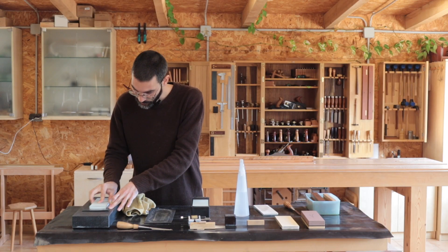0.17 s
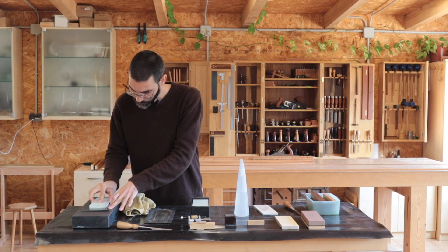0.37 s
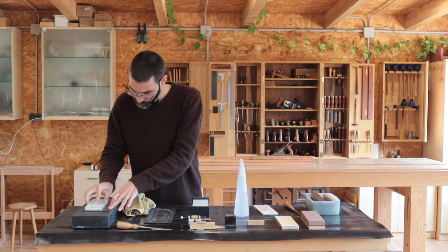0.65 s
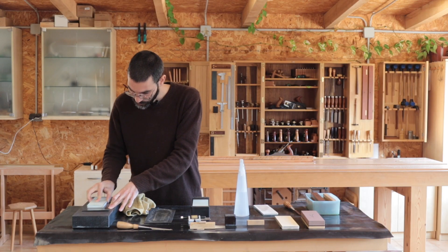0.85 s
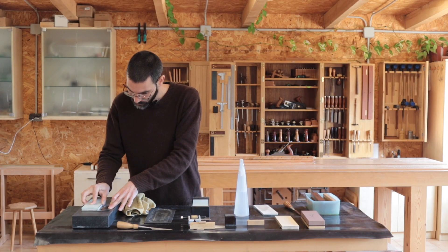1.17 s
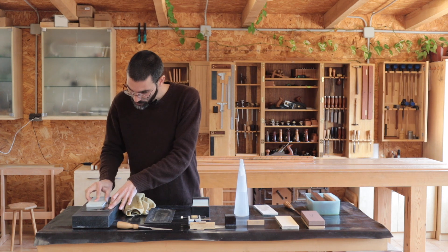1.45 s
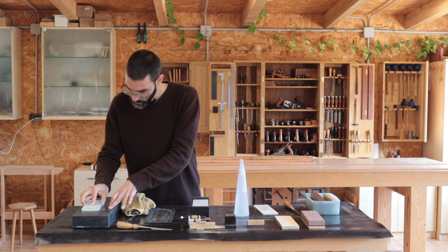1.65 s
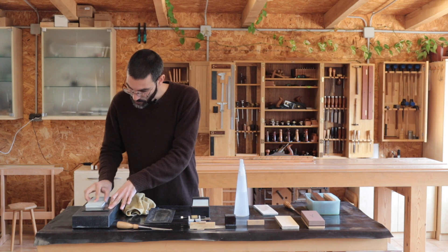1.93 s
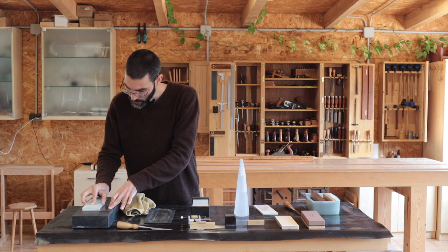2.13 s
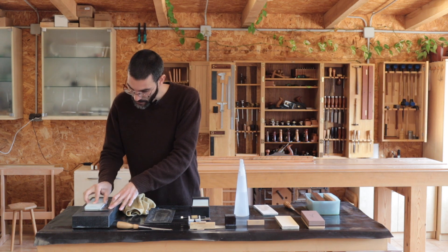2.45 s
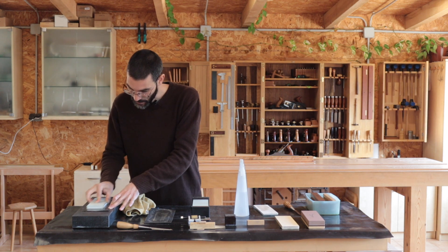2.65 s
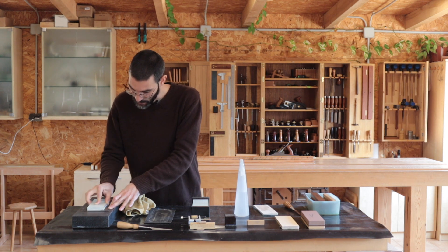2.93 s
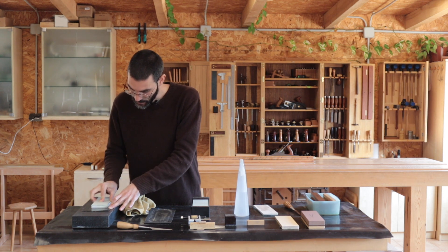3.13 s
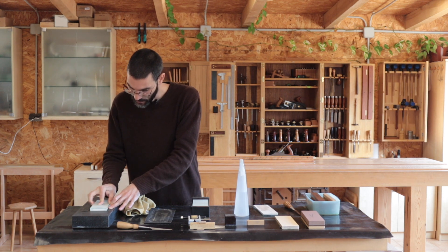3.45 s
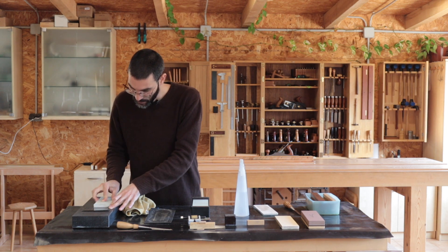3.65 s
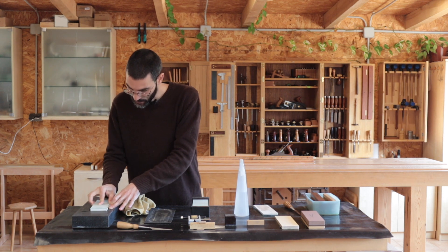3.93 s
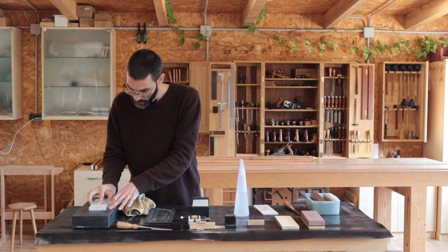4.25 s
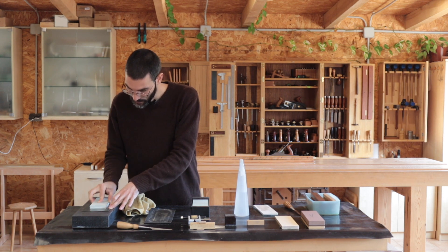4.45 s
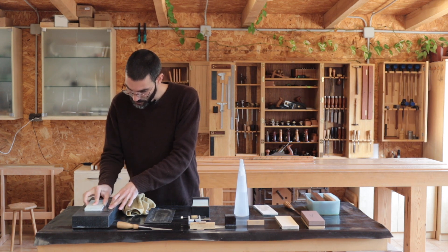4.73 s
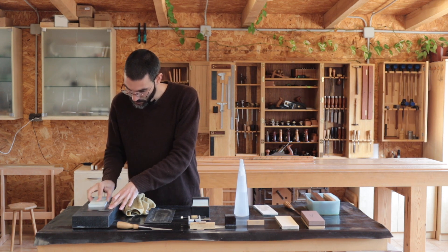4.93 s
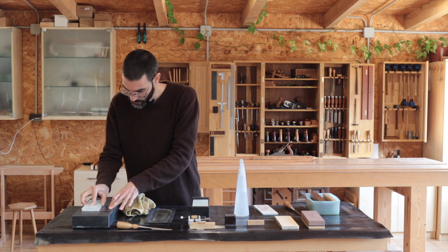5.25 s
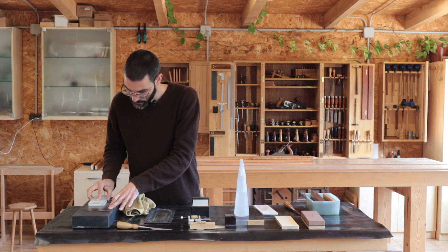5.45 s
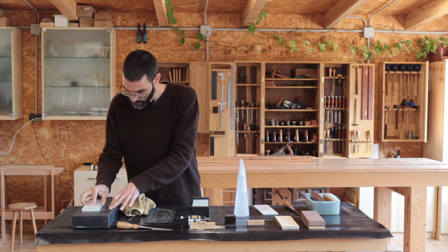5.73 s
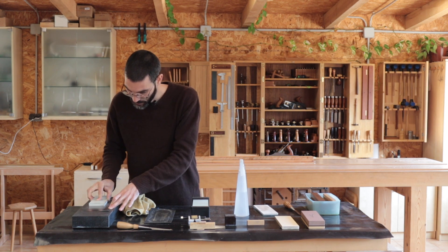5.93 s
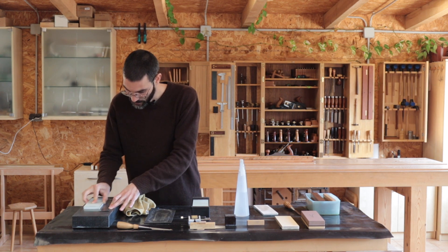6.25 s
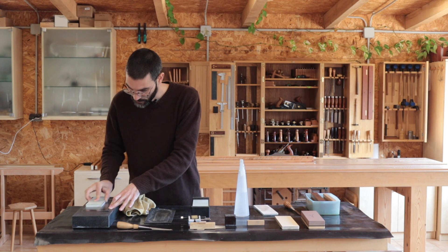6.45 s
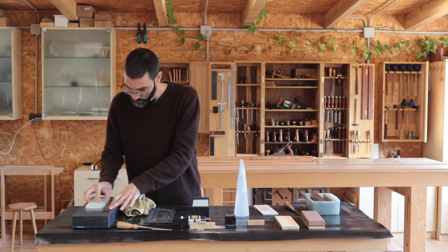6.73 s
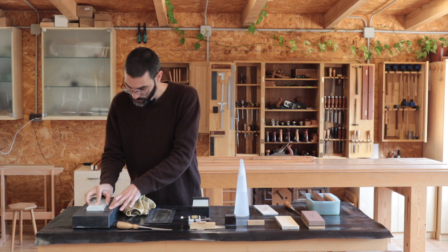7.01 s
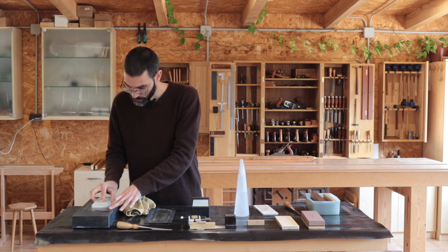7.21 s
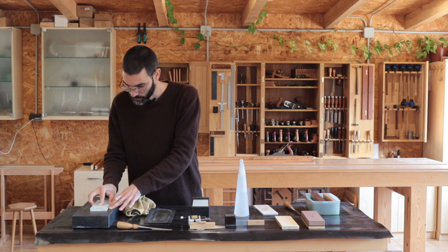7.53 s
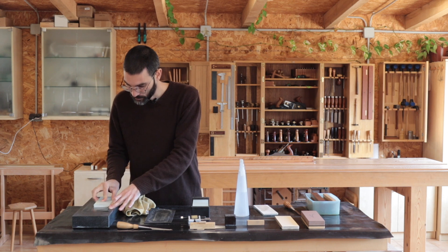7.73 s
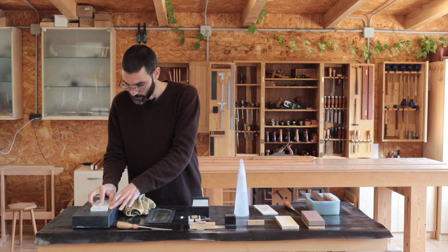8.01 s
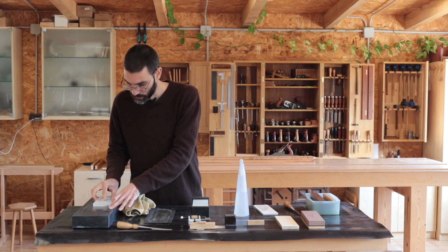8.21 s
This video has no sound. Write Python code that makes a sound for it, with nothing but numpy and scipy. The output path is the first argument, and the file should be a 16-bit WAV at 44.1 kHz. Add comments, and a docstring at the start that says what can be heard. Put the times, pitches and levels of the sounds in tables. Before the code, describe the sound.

Close to the microphone in a small wooden workshop, a sharpening stone rasps to and fro on wet sandpaper in a quick, regular rhythm. The water hisses under it and gives short, high squeals near the start, around a cluster of knocks on the workbench. After that the strokes run on steadily, the bench rumbling and thumping softly at each turn, with a faint hum behind.

```python
"""A small wooden workshop, one microphone close to the bench. A ceramic sharpening stone is scrubbed to
and fro on wet sandpaper stuck to a slab. Grit rasps under the stone and rings the slab; the water film
hisses in a moving band and, on some early strokes, pinches and squeals. The bench rumbles, thumps
softly at each turn and takes the odd knock. A faint hum lies under it all."""
import sys
import numpy as np
from scipy import signal
from scipy.io import wavfile
from scipy.ndimage import uniform_filter1d

SR = 44100
rng = np.random.default_rng(int(sys.argv[2]) if len(sys.argv) > 2 else 0)


def master_out(mix):
    """Clip the mix to full scale and print it as 16-bit PCM to the path in sys.argv[1]."""
    frames = np.transpose(np.atleast_2d(mix))
    ceiling = np.clip(frames, -1, 1)
    pcm = np.round(ceiling * 32767).astype(np.int16)
    wavfile.write(sys.argv[1], SR, pcm)


N = 369147

# spectrum of the bench's rumble: (frequency [Hz], level [dB])
RUMBLE_SPECTRUM = [(30, -3), (60, -18.5), (110, -6), (190, -1.5), (260, -1.5), (340, -2), (440, 3.5),
                   (800, 1), (1200, -7.5), (2000, -15.5)]
# the rumble over time: (time [s], base level [dB], extra bass under 350 Hz [dB])
RUMBLE_LEVELS = [(0.0, -35, -5), (0.3, -43.5, -3), (0.9, -47.5, -1.5), (1.8, -45, -2), (2.1, -46, -1.5),
                 (3.05, -47, 0.5), (3.6, -42.5, -0.5), (4.2, -44, -2), (4.8, -46.5, 1), (6.4, -44.5, 0),
                 (7.1, -44.5, 2), (8.37, -48, 1.5)]
# push and pull in turn: (start [s], stop [s], rasp level [dB], treble tilt [dB], slab ring level [dB],
# hiss pitch [Hz], hiss level [dB], hiss growth over the stroke [dB])
STROKES = [ (0.016, 0.197, -15.5, 0.5, -21.5, 4330, -39, -3), (0.237, 0.434, -16.5, 1, -22, 7150, -26, 5),
           (0.468, 0.647, -15, -2, -20.5, 7450, -28, -3), (0.689, 0.89, -17.5, 0.5, -22, 6940, -27, -6),
           (0.919, 1.104, -16.5, -2, -25.5, 4540, -23.5, -6), (1.139, 1.334, -17, 0, -22.5, 4140, -25, 12),
           (1.371, 1.55, -15.5, -9.5, -28, 3700, -22.5, 7),
           (1.586, 1.788, -18, -0.5, -23.5, 4800, -20.5, -5),
           (1.813, 2.015, -18.5, -1.5, -25, 4400, -26, -3), (2.041, 2.246, -17, 1, -23, 6730, -24, 2),
           (2.286, 2.473, -16, -0.5, -24, 4820, -29, 10), (2.509, 2.712, -16.5, 2, -23.5, 7170, -25.5, 7),
           (2.746, 2.933, -17, 1.5, -22.5, 7250, -31, -20), (2.965, 3.164, -17.5, 5, -23, 8860, -28, 3),
           (3.196, 3.377, -16, 0.5, -22, 4100, -36, 3), (3.414, 3.61, -16, -1, -23, 7750, -27, 3),
           (3.65, 3.826, -17.5, 1.5, -21, 2190, -27.5, 10), (3.869, 4.055, -17, 2, -22.5, 2180, -28, -9),
           (4.092, 4.274, -15.5, -1.5, -22.5, 8150, -30, -1), (4.313, 4.492, -15.5, 0, -23.5, 7900, -27, 4),
           (4.532, 4.72, -16.5, 0.5, -23.5, 2400, -29, 6), (4.754, 4.943, -16, 0.5, -24, 8960, -26, 0),
           (4.976, 5.169, -16, 0, -22.5, 4460, -41, -2), (5.201, 5.39, -15.5, -0.5, -26, 7330, -25, 7),
           (5.431, 5.624, -16.5, 2.5, -23, 6800, -38, -1), (5.653, 5.864, -17, 1, -26, 5880, -23.5, 8),
           (5.896, 6.096, -17.5, 1, -22.5, 8130, -29, -9), (6.126, 6.314, -16.5, 1, -26, 4700, -24, 12),
           (6.351, 6.551, -18, 1.5, -21, 2620, -32.5, 20), (6.589, 6.787, -17.5, 1, -22.5, 7700, -32, 8),
           (6.824, 7.004, -17, 1.5, -23.5, 2600, -30, 13), (7.04, 7.233, -16.5, -1, -24.5, 8230, -23.5, 3),
           (7.268, 7.443, -17, -1.5, -24.5, 2310, -31.5, 12), (7.479, 7.668, -17, -1, -23.5, 2300, -30, 4),
           (7.711, 7.904, -19.5, -1, -25, 2220, -26.5, -1), (7.947, 8.14, -18.5, -2, -25, 2290, -27, 3),
           (8.184, 8.39, -17.5, -4.5, -24.5, 2350, -32.5, 5), ]
# spectrum of the rasp: (frequency [Hz], level [dB])
RASP_SPECTRUM = [(700, -16), (1100, -7.5), (2000, -1.5), (2800, -2), (3500, -3), (4200, -1.5), (5000, -2),
                 (6000, -4.5), (8000, -2.5), (10200, -7)]
# what the rasp gains: (frequency [Hz], near to far end [dB], rest to full speed [dB], start to stop [dB])
RASP_SHIFTS = [(1100, -3.5, -9.5, -5), (1900, -1.5, -2, -1), (2600, 7, -4.5, -3.5), (4000, 1.5, 0, -1.5),
               (6000, 1.5, 1, 0.5), (7700, -2.5, 3, -3)]
# modes of the slab: (frequency [Hz], width [Hz], level [dB])
SLAB_MODES = [(1110, 203, -6), (1250, 49.6, 9), (1323.6, 50.3, 9), (1484, 130, 0), (1728, 84, 6.5),
              (1900, 140, -13)]
# the stone's path favours the modes near this pitch: (time [s], pitch [Hz])
FAVOURED_PITCH = [(0, 1370), (0.6, 1410), (1.3, 1580), (2.6, 1534), (3.7, 1510), (4.3, 1460), (5.3, 1650),
                  (6.6, 1680), (7.3, 1550), (8.37, 1480)]
# the slab's ring at the far end against the near end: (time [s], gain [dB])
RING_FAR_GAIN = [(0, 4.5), (2.5, -3), (4.5, -2.5), (8.37, -9.5)]
# modes of the bench: (frequency [Hz], level [dB], t60 [s])
BENCH_MODES = [(230, -2.5, 0.023), (520, 9.5, 0.013), (734, 1, 0.03)]
# blows on the bench: (time [s], peak [dB], dullness [dB/octave])
KNOCKS = [(.486, -27, -11), (.93, -32, -13), (1.472, -35, 3), (1.598, -14.5, -2), (1.751, -35, 8),
          (1.797, -30, 8), (1.811, -19, 4), (1.853, -18.5, 1.5), (2.052, -29, 0), (3.561, -29, -1),
          (3.82, -41, 7), (4.278, -36, -4), (7.21, -34, 4), (7.239, -41, 14), (7.91, -41, 9)]
# the film pinches: (start [s], stop [s], level [dB], growth [dB], pitch at start [Hz],
# a quarter in [Hz], at stop [Hz])
SQUEALS = [(0.938, 1.064, -20.5, -1, 4700, 4500, 5050), (1.17, 1.34, -27.5, -4, 4070, 4150, 2600),
           (1.381, 1.546, -23.5, -16, 4450, 3440, 4100), (1.637, 1.753, -29, 3, 4100, 4200, 3700),
           (1.83, 2.016, -19.5, -2, 4420, 4150, 4300), (2.325, 2.473, -23, -3, 4600, 4800, 4500)]
# decay of the wooden room: (frequency [Hz], t60 [s])
ROOM_DECAY = [(200, 0.94), (1500, 1), (5000, 0.7), (10000, 0.35)]


def gain_of(db):
    """Decibels to a factor."""
    return 10 ** (np.asarray(db) / 20)


def unit_rms(x):
    """Scales to rms 1."""
    return x / np.sqrt(np.mean(x ** 2) + 1e-20)


def at_hz(points, hz):
    """Reads a table on a log-frequency axis."""
    f, value = np.transpose(points)
    return np.interp(np.log(hz + 1), np.log(f + 1), value)


def add(mix, start_s, sound):
    """Mixes a sound in at a time."""
    part = mix[round(start_s * SR):][:len(sound)]
    part += sound[:len(part)]


def resonate(x, hz, widths_hz):
    """Resonances in series, one per width: each shifts hz down to zero, smooths, and shifts back."""
    carrier = np.exp(2j * np.pi * np.cumsum(hz * np.ones(len(x))) / SR)
    for width in widths_hz:
        pole = np.exp(-np.pi * width / SR)
        x = 2 * (carrier * signal.lfilter([1 - pole], [1, -pole], x / carrier)).real
    return x


def grit(per_s, spread_db):
    """Grains catching and letting go: dense clicks of random sign, a few of them large."""
    size = gain_of(spread_db * np.minimum(rng.exponential(1, N), 5)) * rng.choice([-1., 1.], N)
    return unit_rms(size * (rng.random(N) < per_s / SR))


def coloured(x, colour_db, patchy_db, frame):
    """Shapes short-time spectra by colour_db(hz, t) and by drifting random patches."""
    framing = dict(fs=SR, nperseg=frame, noverlap=frame * 3 // 4)
    hz, t, spectra = signal.stft(x, **framing)
    patches = uniform_filter1d(rng.standard_normal(spectra.shape[::-1]).T, size=5, axis=0)
    patches = unit_rms(uniform_filter1d(patches, size=20, axis=1))
    spectra = spectra * gain_of(colour_db(hz[:, None], t) + patchy_db * patches)
    return unit_rms(signal.istft(spectra, **framing)[1][:N])


def sliding(lead_s, rise_s, fall_s, lag_s):
    """1 while the stone slides, 0 where it rests at the turn."""
    t, gate = np.arange(N) / SR, np.zeros(N)
    for start, stop, *_ in STROKES:
        start, stop = start - lead_s, stop + lag_s
        during = (t > start) & (t < stop)
        bite = (1 - np.exp((start - t[during]) / rise_s)) ** 3.13
        brake = 1 - np.exp((t[during] - stop) / fall_s)
        gate[during] += bite * brake
    return gate


def travel(t, hold_s=0.01):
    """Share of the stroke done, place (-.5 near, .5 far), speed (0-1), then STROKES from rasp level on."""
    rows, done = np.array(STROKES), np.linspace(0, 1, 9)
    start, stop = rows[:, :1], rows[:, 1:2]
    times = start + hold_s + done * (stop - start - 2 * hold_s)
    direction = (-1.) ** np.arange(len(rows))[:, None]
    place, speed = direction * (done - .5), 1 - (2 * done - 1) ** 2
    curves = [done, place, speed, *rows.T[2:, :, None]]
    return [np.interp(t, times.ravel(), np.broadcast_to(c, times.shape).ravel()) for c in curves]


def hum(hz=249, db=-61):
    """A faint wavering hum: noise in one narrow low resonance."""
    return gain_of(db) * unit_rms(resonate(rng.standard_normal(N), hz, widths_hz=(18, 40)))


def bench_rumble():
    """The bench's rumble dips mid-stroke and swells around each turn, as under automatic gain control."""
    times, db, bass_db = np.transpose(RUMBLE_LEVELS)

    def colour_db(hz, t):
        return at_hz(RUMBLE_SPECTRUM, hz) + (hz < 350) * np.interp(t, times, bass_db)

    rumble = coloured(grit(per_s=3000, spread_db=3.8), colour_db, patchy_db=2.46, frame=1024)
    rest = 1 - sliding(lead_s=0.0028, rise_s=0.0075, fall_s=0.0084, lag_s=0.014)
    turn_db = 13.0 * uniform_filter1d(rest, size=4400) - 4.4 * rest
    return rumble * gain_of(np.interp(np.arange(N) / SR, times, db) + turn_db)


def rasp():
    """Grit under the stone: its colour shifts with place, speed and wear; pressure tilts the treble."""
    def colour_db(hz, t):
        done, place, speed, _, tilt_db, *_ = travel(t)
        shifts = np.array(RASP_SHIFTS)
        far_db, speed_db, wear_db = (at_hz(shifts[:, [0, k]], hz) for k in (1, 2, 3))
        shift_db = far_db * place + speed_db * (speed - .5) + wear_db * (done - .5)
        treble = np.clip(np.log2(hz / 4000 + 1e-9), 0, 1)
        return at_hz(RASP_SPECTRUM, hz) + shift_db + treble * tilt_db

    return coloured(grit(per_s=22000, spread_db=1.44), colour_db, patchy_db=1.96, frame=256)


def film_hiss(hz):
    """The water film hisses: grit in a broad moving band."""
    return unit_rms(resonate(grit(per_s=20000, spread_db=2.5), hz, widths_hz=(1500, 1900)))


def stone_ring(hz=6060, db=-37.5):
    """The stone itself rings faintly in one high mode."""
    return gain_of(db) * unit_rms(resonate(grit(per_s=6200, spread_db=2.0), hz, widths_hz=(50, 120)))


def slab_ring(t, done, place, speed):
    """Grit rings the slab's modes, each struck at other spots, hardest as the stone bites."""
    favoured_hz = np.interp(t, *np.transpose(FAVOURED_PITCH)) + 60 * (speed - .5) + 40 * place
    drive, ring = grit(per_s=6000, spread_db=3.37), np.zeros(N)
    for k, (hz, width, db) in enumerate(SLAB_MODES):
        loss_db = 5 * ((hz - favoured_hz) / 400) ** 2
        ring += gain_of(db - loss_db) * resonate(np.roll(drive, 97 * k), hz, (7 * width, width))
    ring /= np.sqrt(uniform_filter1d(ring ** 2, size=8000) + 1e-12)  # steadies the level
    bite_db = 5 * np.exp(-done / 0.19)
    wear_db, speed_db = -3 * (done - .5), -2.5 * (speed - .5)
    place_db = place * np.interp(t, *np.transpose(RING_FAR_GAIN))
    return ring * gain_of(bite_db + wear_db + speed_db + place_db)


def scrub():
    """The strokes play rasp, hiss, stone and slab together."""
    t = np.arange(N) / SR
    done, place, speed, rasp_db, _, ring_db, hiss_hz, hiss_db, growth_db = travel(t)
    hiss_db = hiss_db + 2.5 * (speed - .5) + growth_db * (done - .5)
    rubbing = gain_of(rasp_db) * rasp() + gain_of(hiss_db) * film_hiss(hiss_hz)
    uneven_slip = gain_of(0.53 * unit_rms(uniform_filter1d(rng.standard_normal(N), size=500)))
    rubbing += stone_ring()
    ring = gain_of(ring_db) * slab_ring(t, done, place, speed)
    # the slab answers as soon as the stone moves; the treble needs speed
    ring *= sliding(lead_s=0.017, rise_s=0.02, fall_s=0.0092, lag_s=0.005)
    rubbing *= sliding(lead_s=0.01, rise_s=0.011, fall_s=0.015, lag_s=0.0021)
    bass_cut = signal.butter(3, 800, "high", fs=SR, output="sos")  # the scrubbing carries nothing below 800 Hz; the lows belong to the bench
    return signal.sosfilt(bass_cut, uneven_slip * (rubbing + ring))


def knock(peak_db, dullness, rise_s=0.0029):
    """A soft blow rings the bench's damped modes."""
    t = np.arange(3000) / SR
    ring = sum(gain_of(db - dullness * np.log2(hz / 500) - 60 * t / t60) * np.sin(2 * np.pi * hz * t)
               for hz, db, t60 in BENCH_MODES)
    ring *= 1 - np.exp(-t / rise_s)
    return gain_of(peak_db) * ring / abs(ring).max()


def bench_knocks():
    """A dull thump where each stroke stops, and the odd knock."""
    out = np.zeros(N)
    for _, stop, *_ in STROKES:
        add(out, rng.normal(stop, 0.005), knock(peak_db=rng.normal(-43, 2.5), dullness=18))
    for start, peak_db, dullness in KNOCKS:
        add(out, start, knock(peak_db, dullness))
    return out


def film_squeals():
    """The water film pinches and squeals: noise in a narrow resonance that glides."""
    out = np.zeros(N)
    for start, stop, db, growth_db, *glide_hz in SQUEALS:
        done = np.linspace(0, 1, round((stop - start) * SR))
        hz = np.interp(done, [0, .25, 1], glide_hz)
        drive = rng.standard_normal(SR // 5)[:len(done)]
        tone = unit_rms(resonate(drive, hz, widths_hz=(480, 800)))
        envelope = gain_of(db + growth_db * (done - .5)) * signal.windows.tukey(len(done), .15)
        add(out, start, envelope * tone)
    return out


def room(x):
    """Reflections off the wood: one of random sign in every 20 samples, each band dying at its own rate."""
    taps = np.zeros(SR // 2)
    slots = np.arange(200, SR // 2 - 20, 20)
    taps[slots + rng.integers(0, 20, len(slots))] = rng.choice([-1., 1.], len(slots))
    hz, t, spectra = signal.stft(taps, SR, nperseg=256)
    decay = gain_of(-60 * t / at_hz(ROOM_DECAY, hz)[:, None])
    tail = signal.istft(spectra * decay, SR, nperseg=256)[1]
    return signal.fftconvolve(x, tail / np.linalg.norm(tail))[:N]


def scene():
    """One close microphone on both channels: mostly direct sound, a little room."""
    direct = scrub() + film_squeals() + bench_rumble() + bench_knocks()
    return np.tile(direct + gain_of(-16.5) * room(direct) + hum(), (2, 1))


def record(dry, low_hz=55, high_hz=9990):
    """The microphone's bass roll-off, then the band limit."""
    thin = signal.sosfilt(signal.butter(2, low_hz, "high", fs=SR, output="sos"), dry)
    band_limit = signal.firwin(401, high_hz, window=("kaiser", 6), fs=SR)
    return signal.oaconvolve(thin, band_limit[None], "same")


dry = scene()
out = record(dry)
master_out(out)
```